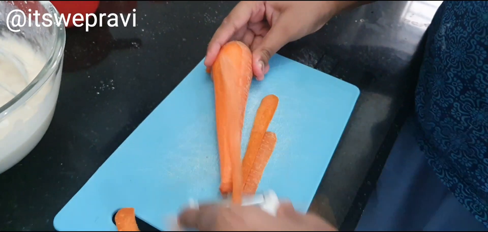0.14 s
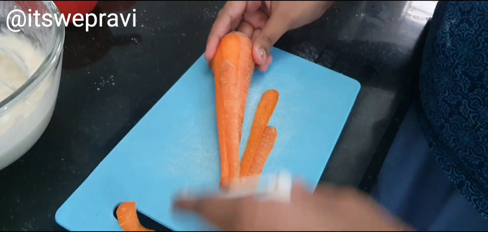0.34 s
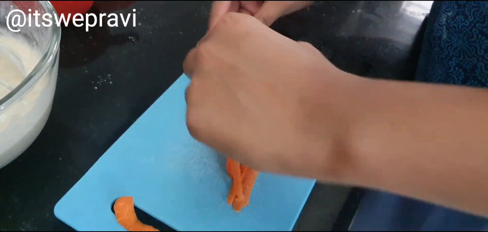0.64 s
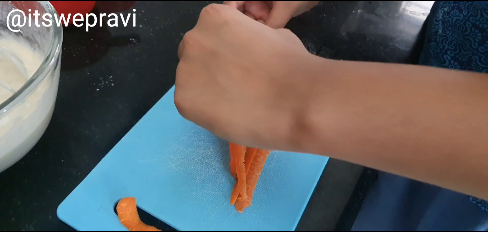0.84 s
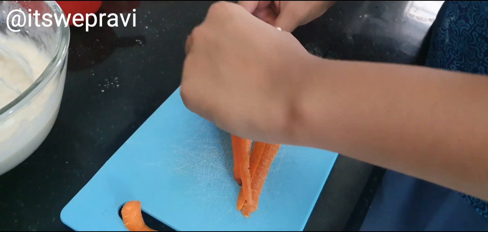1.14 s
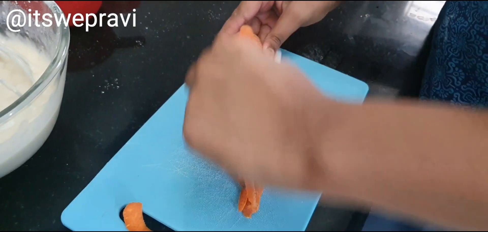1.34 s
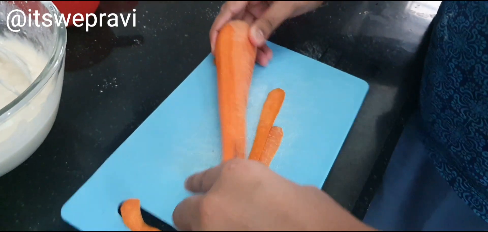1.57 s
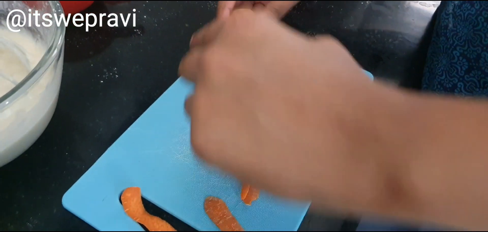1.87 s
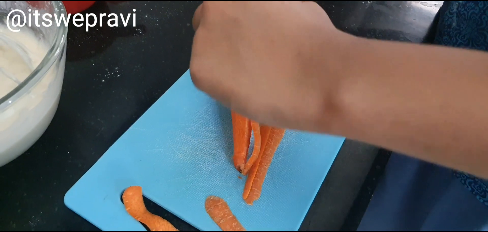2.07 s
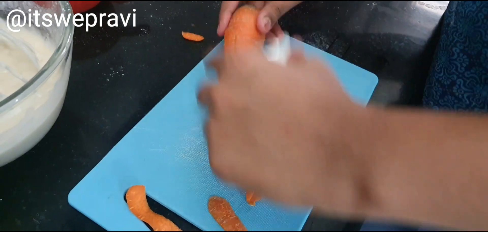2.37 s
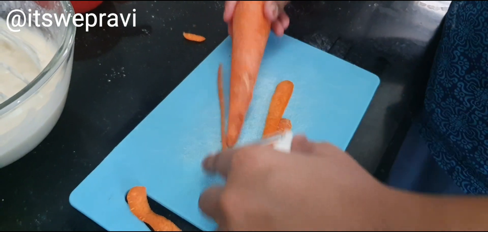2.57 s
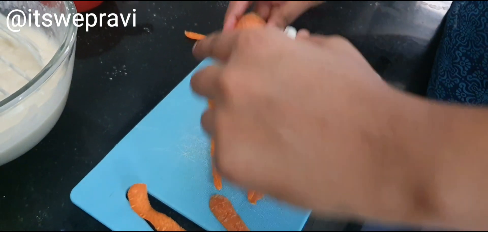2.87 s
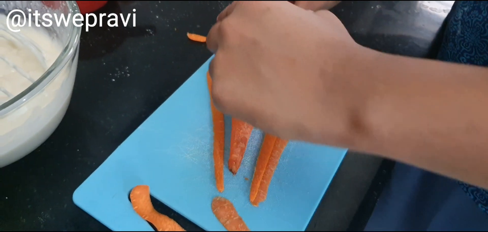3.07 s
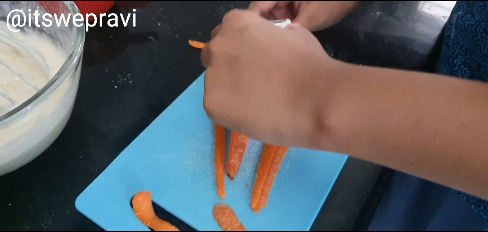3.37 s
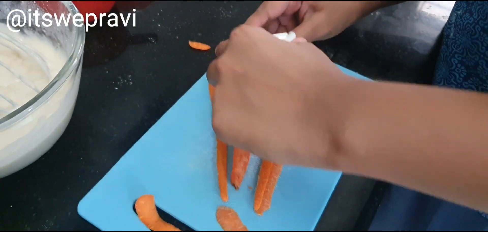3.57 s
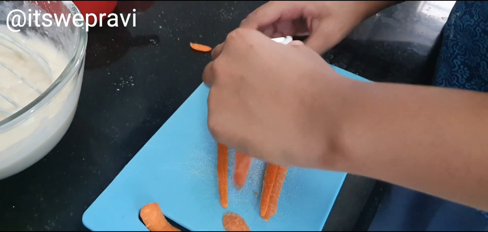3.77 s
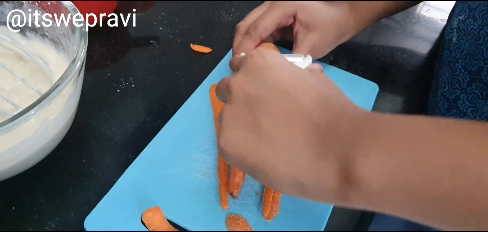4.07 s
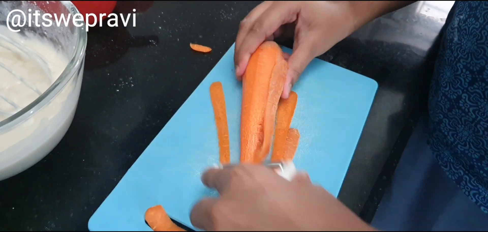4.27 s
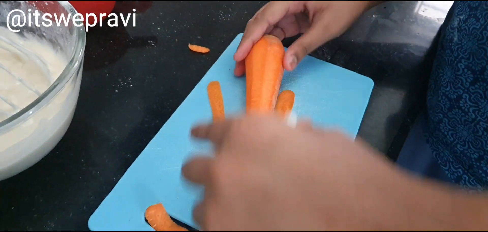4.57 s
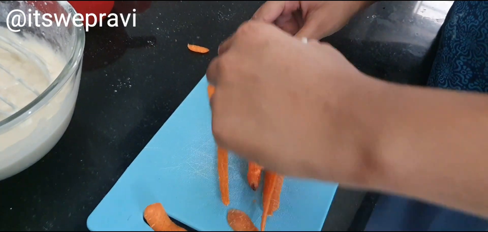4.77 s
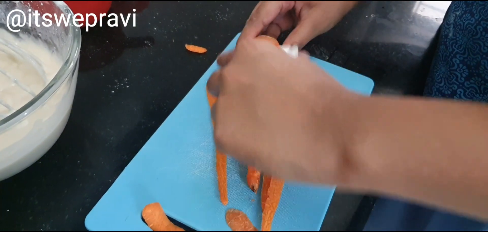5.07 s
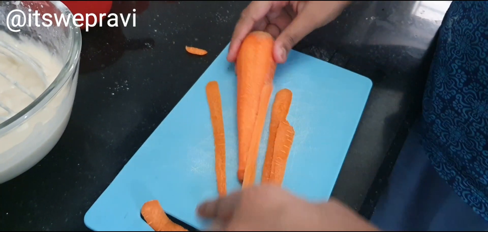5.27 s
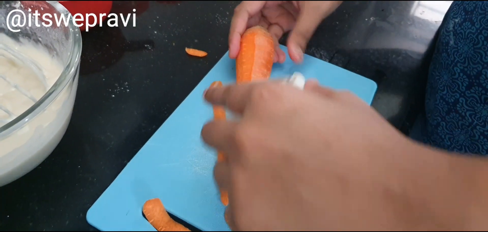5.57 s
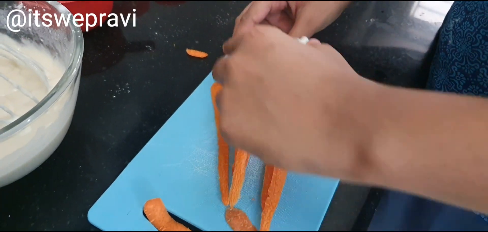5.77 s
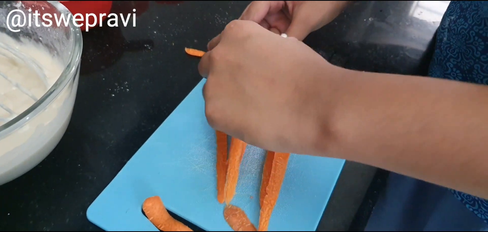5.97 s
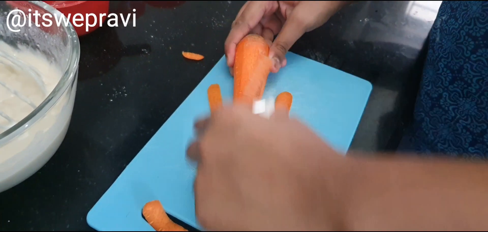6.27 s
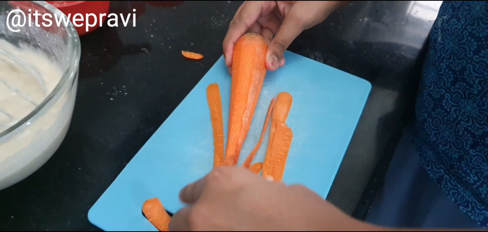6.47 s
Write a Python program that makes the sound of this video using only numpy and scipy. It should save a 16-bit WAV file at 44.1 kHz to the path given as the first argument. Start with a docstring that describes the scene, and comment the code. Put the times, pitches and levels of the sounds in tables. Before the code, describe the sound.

Close up in a reverberant kitchen, a swivel peeler shaves a raw carrot on a plastic board. A rising, crunchy rasp ends abruptly, then the loose blade clicks in small clusters. Further strokes follow at uneven gaps, with juddering snags at the thin tip, a faint wet squeak and soft low thumps. A low wavering hum and room rumble stay beneath.

```python
"""A hard-walled kitchen: a swivel peeler shaves a raw carrot on a plastic board.
The loose steel blade clicks and rings; long strokes crunch as random tiny breaks excite resonances.
The blade judders over the thin tip, which knocks on the board; the carrot is turned over once.
Wet rubs squeak and soft thumps land.
Below lie a low wavering hum, room rumble and a faint hiss; the kitchen reverberates."""
import sys
import numpy as np
from scipy import signal
from scipy.fft import rfft, irfft
from scipy.io import wavfile

SR = 44100
rng = np.random.default_rng(int(sys.argv[2]) if len(sys.argv) > 2 else 0)


def transcribe(signal):
    """Save signal, clipped to [-1, 1], as a 16-bit WAV file at the path in sys.argv[1]."""
    frames = np.atleast_2d(signal).T
    limited = np.clip(frames, -1, 1)
    pcm = np.round(limited * 32767).astype(np.int16)
    wavfile.write(sys.argv[1], SR, pcm)


N = 292383   # length in samples
T = np.arange(N) / SR

# Levels in these tables are relative: the layers also have their own gains.
# room rumble spectrum: (frequency [Hz], level [dB])
RUMBLE_SPECTRUM = [(25, -24), (40, -14.5), (62, -7.5), (80, -2.5), (100, -9), (140, -9), (210, -13),
                   (310, -9.5), (500, -19.5), (700, -25), (1000, -32.5), (2500, -38), (6000, -45.5),
                   (16000, -51)]
# left-right likeness of the rumble: (frequency [Hz], likeness [0 to 1])
RUMBLE_LIKENESS = [(50, .6), (150, 0.99), (500, .7), (2000, .4), (8000, .1)]
# motor hum lines: (frequency [Hz], level [dB])
HUM_LINES = [(79, -51), (139, -61.5)]
# soft thumps as the weight of the hands shifts, and at 2.338 s as the carrot is turned over: (time [s], level
# [dB])
SOFT_THUMPS = [(2.338, -7.5), (5.73, -5.5), (5.807, -8), (5.959, -2), (6.002, -12), (6.301, -5)]
# resonances of the counter: (frequency [Hz], width [Hz], level [dB], left over right [dB])
COUNTER_MODES = [(76.8, 26, 4, 0.5), (87, 34, -1.5, -0.5), (150.7, 62, -11.5, 1)]
# wet carrot rubbing on the board, hollow tones and squeaks: (time [s], frequency [Hz], level [dB])
WET_RUBS = [(.184, 423, -36), (.18, 2160, -22.5), (1.44, 341, -38), (1.46, 690, -48.5), (1.495, 288, -36.5),
            (2.52, 698, -47), (4.379, 1130, -28.5), (4.437, 582, -38.5), (5.32, 543, -55)]
# the blade clicking in its pivots: (time [s], level [dB], brightness [dB per octave])
PIVOT_CLICKS = [ (.7088, -3.5, 3), (.7352, -5, -1), (.7585, -7, 4.5), (.7730, -3.5, 4), (.7855, -11.5, -11),
                (.9545, -22, 1), (1.0238, -9, 2), (1.0285, -8, 5), (1.0362, 0, 0.5), (1.2103, -16.5, -9),
                (1.5826, -2.5, -0.5), (2.158, -30, -4), (2.3155, -32.5, -4), (2.3274, -28, 0),
                (2.3466, -12.5, 0), (2.3520, -16, 1.5), (2.3665, -15, 0.5), (2.3965, -23, 1),
                (2.4238, 1.5, 6.5), (2.4298, -3, 4.5), (2.5822, -15, -13), (2.603, -9, -3.5),
                (3.177, -41, 0.5), (3.2076, -29.5, -6), (3.2287, -11, 3.5), (3.2475, -13.5, -1),
                (3.4804, -16, -7.5), (3.897, -27.5, -4), (3.928, -21, -0.5), (3.963, -18.5, 2.5),
                (4.0445, -18, -0.5), (4.092, -16.5, -0.5), (4.1108, -10.5, -0.5), (4.923, -8, 0.5),
                (4.9336, -2, 2), (4.9472, 1.5, 0.5), (5.2495, 1, 6), (5.902, -22, 4), (5.9052, 2.5, 2),
                (6.5337, -17.5, 3.5)]
# resonances of the free blade: (frequency [Hz], width [Hz], level [dB], left over right [dB])
FREE_BLADE_MODES = [(2713, 140, -3.5, -7), (2912, 270, 1.5, 5), (4200, 700, -7.5, 1.5),
                    (5120, 408, 3.5, 0.5), (5363, 920, -1.5, -0.5), (7400, 900, -13, -1),
                    (8830, 900, -11, 2), (11100, 770, -12, -0.5), (12000, 900, -17.5, -0.5),
                    (14600, 800, -25.5, -3.5)]
# the blade snags and jumps on in even steps, mostly at the thin tip:
# (start [s], step [s], jolt [dB], crunch [dB], judder [dB])
BLADE_SNAGS = [ (0.097, .0355, 3.5, -28, -20.5), (.185, .0125, -8, -24.5, -17),
               (1.439, .018, -13.5, -29, -24), (1.554, .037, -19, -40, -28.5),
               (3.928, .004, -16, -46.5, -42.5), (4.356, .011, 0, -25.5, -23.5),
               (4.395, .015, -8, -30.5, -20.5), (5.243, 0.0045, -13.5, -29.5, -23),
               (6.322, .053, -5.5, -35.5, -25.5)]
# strokes and light grazes of the blade, and at 2.334 s the carrot turned over on the board:
# (start [s], rise [s], fall [s], crunch [dB], carrot judder [dB], board thrum [dB])
STROKES_AND_TURN = [ (-.12, 0.27, 0.061, -26, -26, -33), (1.207, 0.2, 0.13, -24, -26.5, -37.5),
                    (2.334, .018, .075, -51, -43.5, -43.5), (2.564, 0.03, 0.051, -33, -33.5, -46),
                    (3.44, 0.052, 0.023, -41, -45, -44), (3.51, .08, .15, -60.5, -61.5, -58.5),
                    (3.805, 0.034, .05, -57, -54, -50), (3.92, 0.015, 0.2, -47.5, -44, -47),
                    (4.077, .18, .095, -27, -26.5, -36), (5.01, .12, 0.14, -27.5, -30, -41),
                    (5.578, .04, 0.027, -66.5, -61, -63), (6.14, .16, .165, -27, -26, -36.5)]
# resonances of the peeler pressed into the carrot:
# (frequency [Hz], width [Hz], level [dB], left over right [dB])
PRESSED_BLADE_MODES = [(2868, 93, 4, 7), (3680, 260, -8, 2.5), (4560, 360, -0.5, 1.5),
                       (5385, 600, -3.5, -1.5), (6160, 1300, -8, 0), (8750, 1500, -10.5, -1.5),
                       (9750, 1200, -6, 3), (11100, 1700, -11, -9), (14400, 530, -16.5, -2),
                       (15660, 900, -19, 6)]
# resonances of the carrot on the board: (frequency [Hz], width [Hz], level [dB], left over right [dB])
CARROT_MODES = [(558.6, 16, -5.5, -3), (660, 41, -2, 0.5), (790, 110, -2.5, 1), (1016, 240, -4.5, 6),
                (1327, 180, -0.5, 3.5), (1580, 350, 1.5, 3.5), (1856, 360, 2.5, 4), (2220, 140, 3, 6),
                (2690, 350, 1, 3.5), (3770, 900, -8.5, 9.5)]
# low resonances of the board: (frequency [Hz], width [Hz], level [dB], left over right [dB])
BOARD_MODES = [(83, 120, -2.5, 4), (135, 54, 2.5, 3), (184, 50, -10.5, 1), (285, 19, -2, 2),
               (329.6, 14, 1, -0.5), (410, 37, -4, -0.5), (506.6, 88, -6.5, 4.5)]
# reverberation time: (frequency [Hz], 60 dB decay [s])
KITCHEN_DECAY = [(200, 2), (800, 0.48), (2500, 0.577), (5000, 0.6642), (10000, 0.3154), (16000, 0.6)]
# reverberation strength: (frequency [Hz], level [dB])
KITCHEN_LEVEL = [(200, -5.5), (800, -3.5), (2500, -5), (5000, -6.5), (10000, -5), (16000, -11.5)]

# every stroke, and the turn, is one arch: it climbs by BITE_DB, fast at first, and eases off by EASE_DB
BITE_DB, BITE_CURVE, EASE_DB, EASE_CURVE = 22, 3.3, 17.5, 2.2
TAPER_DB = 4   # the judder gains this much along an arch, as the carrot gets thinner in a stroke
THRUM_FOLLOWS = 0.55   # share of the arch in dB that the board follows
TOUCH_FADE_S = 0.008   # Gaussian fade time on either side of a touch
KNOCK_FOLLOWS = 0.85   # share of a click's level in dB that the knock on the carrot follows
DULL_KNOCK_OCTAVES = 0.5   # extra knock dB for each dB per octave of dullness
RUB_S, RUB_Q = 0.03, 17.0   # Gaussian half length of a rub; its pitch over its bandwidth
JUMPS = 3   # jolts in each snag
SNAG_HOLD_S = 0.0048   # the carrot judders on after the last jump
SNAG_THRUM_DB = -18.5   # thrum setting relative to the judder setting of a snag


def from_db(db):
    """Decibels to gain."""
    return 10 ** (np.asarray(db) / 20)


def rms_one(x):
    """Scale to rms 1, all channels together."""
    return x / np.sqrt(np.mean(x ** 2) + 1e-20)


def at_hz(points, hz):
    """Read a table on a log-frequency axis."""
    f, value = np.transpose(points)
    return np.interp(np.log(np.maximum(hz, 1)), np.log(f), value)


def drift(rate):
    """Random wander: straight lines between unit-spread random points, `rate` points a second."""
    knots = rng.standard_normal(8192)
    return np.interp(T * rate, np.arange(len(knots)), knots)


def both_sides(count, alike):
    """Random strengths for left and right: each small event radiates in its own way."""
    mid, side = rng.standard_normal((2, count))
    alike = np.clip(alike, 0, 1)
    return np.sqrt((1 + alike) / 2) * mid + np.sqrt((1 - alike) / 2) * side * [[1], [-1]]


def body(force, modes, wander_db, tilt_db=0):
    """Parallel resonances; the shifting grip changes how each one radiates to either side."""
    out, power = 0, 0
    for k, (hz, width, db, pan_db) in enumerate(modes):
        r = np.exp(-np.pi * width / SR)   # pole radius: wider modes die sooner
        drive = force * from_db(tilt_db * np.log2(hz / 4000)) + 1e-18
        resonator = [1, -2 * r * np.cos(2 * np.pi * hz / SR), r * r]
        ring = signal.lfilter([1, 0, -1], resonator, drive)
        left_db = pan_db / 2 + wander_db * drift(11)
        right_db = -pan_db / 2 + wander_db * drift(12)
        sides = np.array([left_db, right_db])
        # neighbouring modes alternate in sign
        out = out + (-1) ** k * (1 - r * r) / 2 * ring * from_db(db + sides)
        power += from_db(db) ** 2 * (1 - r * r) / 2
    return out / np.sqrt(power)


def fractures(per_s, spread_db, alike):
    """Random tiny breaks of unequal size; rms 1."""
    born = rng.random(N) < per_s / SR
    sizes = from_db(spread_db * np.minimum(rng.exponential(1, N), 3))
    return rms_one(born * sizes * np.tanh(both_sides(N, alike)))


def contacts(times, levels_db, buzz_s, buzz, alike):
    """Each contact is one sharp impact and a short buzz of rebounds."""
    age = np.arange(2048) / SR
    force = np.zeros((2, N + len(age)))
    for s, db in zip(times, levels_db):
        rebounds = both_sides(len(age), alike) * np.exp(-age / buzz_s)
        hit = buzz * rebounds / np.linalg.norm(rebounds, axis=1, keepdims=True)
        hit[:, 0] = 1   # the impact itself
        start = int(s * SR)
        force[:, start:start + len(age)] += from_db(db) * hit / np.sqrt(1 + buzz ** 2)
    return force[:, :N]


def background(air_db, hiss_db, hiss_hz, hiss_width_hz, left_db):
    """Noise shaped into room rumble, a motor hum wavering in phase and level, a thin band of hiss."""
    hz = np.arange(N // 2 + 1) * SR / N
    mid, side, hiss = rfft(rng.standard_normal((3, N)))
    alike = np.clip(at_hz(RUMBLE_LIKENESS, hz), 0, 1)
    pair = np.sqrt(1 + alike) * mid + np.sqrt(1 - alike) * side * [[1], [-1]]
    air = from_db(air_db) * rms_one(irfft(pair * from_db(at_hz(RUMBLE_SPECTRUM, hz)), N))
    hiss_band = np.exp(-((hz - hiss_hz) / hiss_width_hz) ** 2)
    thin = rms_one(irfft(np.array([hiss, side]) * hiss_band, N))
    hum = 0
    for f, db in HUM_LINES:
        tone = np.sin(2 * np.pi * f * T + 0.62 * drift(9))
        hum = hum + from_db(db) * rms_one(tone * from_db(2.5 * drift(5.4)))
    return (air + hum + from_db(hiss_db) * thin) * from_db([[left_db / 2], [-left_db / 2]])


def bumps(bump_db, soft_hz):
    """Soft thumps are impacts softened by a low-pass that thump through the counter."""
    s, level_db = np.transpose(SOFT_THUMPS)
    force = contacts(s, level_db + bump_db, buzz_s=0.01, buzz=0.26, alike=0.9)
    soft = signal.sosfilt(signal.butter(2, soft_hz, fs=SR, output="sos"), force)
    return body(soft, COUNTER_MODES, wander_db=0.5)


def rubs(rub_db):
    """Each rub is friction noise that swells and fades in one narrow resonance."""
    out = 0
    for s, hz, db in WET_RUBS:
        friction = both_sides(N, alike=0.85) * np.exp(-((T - s) / RUB_S) ** 2)
        out = out + from_db(db + rub_db) * body(friction, [(hz, hz / RUB_Q, 0, 2)], wander_db=-1)
    return out


def rattle(click_db, knock_db):
    """The steel blade rings against its stops and nudges the carrot, more so in dull contacts."""
    s, level_db, brightness = np.transpose(sorted(PIVOT_CLICKS))
    nudge_db = KNOCK_FOLLOWS * level_db - DULL_KNOCK_OCTAVES * brightness
    # the latest click sets the brightness of the drive
    latest = np.maximum(np.searchsorted(s, T + 1 / SR, "right") - 1, 0)
    clicks = contacts(s, level_db + click_db, buzz_s=0.0036, buzz=2.3, alike=0.1)
    steel = body(clicks, FREE_BLADE_MODES, wander_db=1.0, tilt_db=brightness[latest])
    nudges = contacts(s, nudge_db + knock_db, buzz_s=0.0069, buzz=2.5, alike=0.21)
    return steel + body(nudges, CARROT_MODES[:7], wander_db=1.5)   # lower carrot modes only


def snags(knock_db, snap_db):
    """At each step of a snag the edge catches, the tip slaps the board and the strip snaps."""
    jolts = [(start + k * step, db) for start, step, db, _, _ in BLADE_SNAGS for k in range(JUMPS)]
    s, level_db = np.transpose(jolts)
    force = contacts(s, level_db, buzz_s=0.01, buzz=2.0, alike=0.86)
    knock = from_db(knock_db) * body(force, CARROT_MODES, wander_db=5.5)
    snap = from_db(snap_db) * body(force, PRESSED_BLADE_MODES, wander_db=4.5)
    return knock + snap


def held(t, start, length):
    """1 during a touch, fading quickly on either side."""
    outside = np.maximum(np.maximum(start - t, t - start - length), 0)
    return np.exp(-np.minimum(outside / TOUCH_FADE_S, 10) ** 2)


def contact_forces():
    """Gains of crunch, judder and thrum: an arch for each stroke and the turn, a plateau for each snag."""
    t = T[::32]   # a coarse clock is enough for these slow gains
    gains = np.zeros((3, len(t)))
    for start, rise, fall, crunch_db, judder_db, thrum_db in STROKES_AND_TURN:
        biting = np.clip((start + rise - t) / rise, 0, 1)
        easing = np.clip((t - start - rise) / fall, 0, 1)
        arch_db = -BITE_DB * biting ** BITE_CURVE - EASE_DB * easing ** EASE_CURVE
        taper_db = TAPER_DB * (np.clip((t - start) / (rise + fall), 0, 1) - 0.5)
        levels = [crunch_db + arch_db, judder_db + arch_db + taper_db, thrum_db + THRUM_FOLLOWS * arch_db]
        gains = np.maximum(gains, from_db(levels) * held(t, start, rise + fall))
    for start, step, _, crunch_db, judder_db in BLADE_SNAGS:
        levels = [[crunch_db], [judder_db], [judder_db + SNAG_THRUM_DB]]
        length = (JUMPS - 1) * step + SNAG_HOLD_S
        gains = np.maximum(gains, from_db(levels) * held(t, start, length))
    return [np.interp(T, t, gain) for gain in gains]


def peeling_and_turning(crunch_db, judder_db, thrum_db):
    """Cells burst faster as the edge bites; the carrot, peeled or turned, sticks, slips, shakes the board."""
    bite, drag, push = contact_forces()
    per_s = 800 + 4500 * np.sqrt(bite / bite.max())
    # denser bursts are scaled down to keep their power even
    cells = fractures(per_s, spread_db=1.2, alike=0.4) / np.sqrt(per_s / per_s.mean())
    grab = rms_one(from_db(2.2 * drift(220)))   # rapid uneven grip
    slips = fractures(1800, spread_db=0.5, alike=0.85)
    shakes = fractures(1500, spread_db=-2.5, alike=1.0)
    crunch = body(bite * grab * cells, PRESSED_BLADE_MODES, wander_db=1.14)
    judder = body(drag * grab * slips, CARROT_MODES, wander_db=0.94)
    thrum = body(push * shakes, BOARD_MODES, wander_db=0.0)
    return from_db(crunch_db) * crunch + from_db(judder_db) * judder + from_db(thrum_db) * thrum


def board_echo(x, strength, delay_s, travel):
    """The board mirrors the sound; as the hand moves the delay changes and bright bands sweep."""
    echo = [np.interp(T - delay_s * np.exp(travel * drift(8)), T, side) for side in x]
    return (x + strength * np.array(echo)) / np.sqrt(1 + strength ** 2)


def kitchen(dry, build_s, early_db, early_s):
    """Counter and cupboards answer first; then the walls ring on, each band at its own decay rate."""
    age = T[:int(0.8 * SR)]
    edges = np.geomspace(70, 18000, 13)   # band edges in Hz
    white = rng.standard_normal((2, 2, len(age)))
    onset = (1 - np.exp(-age / build_s)) * (1 + from_db(early_db) * np.exp(-age / early_s))
    response = 0
    for k, (low, high) in enumerate(zip(edges, edges[1:])):
        hz = np.sqrt(low * high)
        decay = from_db(-60 * age / at_hz(KITCHEN_DECAY, hz)) * onset
        band_pass = signal.butter(2, [low, high], "band", fs=SR, output="sos")
        band = signal.sosfilt(band_pass, white[k % 2])
        response = response + from_db(at_hz(KITCHEN_LEVEL, hz)) * band * decay / np.linalg.norm(decay)
    return dry + signal.fftconvolve(dry, response, axes=1)[:, :N]


def scene():
    """The board lies a little to the left, so the right side hears it slightly late."""
    work = peeling_and_turning(crunch_db=5.5, judder_db=2.5, thrum_db=4.0) + snags(knock_db=6.5, snap_db=2.5)
    work = board_echo(work, strength=0.51, delay_s=0.0011, travel=0.25)
    handling = rattle(click_db=13.5, knock_db=-2.5) + bumps(bump_db=6.0, soft_hz=160) + rubs(rub_db=2.5)
    left, right = work + handling
    near = np.array([left, np.r_[0, 0, right[:-2]]])   # right is two samples late
    room = kitchen(near, build_s=0.0019, early_db=9.0, early_s=0.03)
    return room + background(air_db=-50.5, hiss_db=-70, hiss_hz=8280, hiss_width_hz=800, left_db=1.0)


def record(dry):
    """The small microphones lose the deepest bass; peaks are clipped at full scale, then the top is cut."""
    thin = signal.sosfilt(signal.butter(2, 45, "high", fs=SR, output="sos"), dry)
    top_cut = signal.ellip(12, 0.1, 80, 15750, fs=SR, output="sos")   # steep low-pass, edge in Hz
    return signal.sosfilt(top_cut, np.clip(thin, -1, 1))


dry = scene()
out = record(dry)
transcribe(out)
```